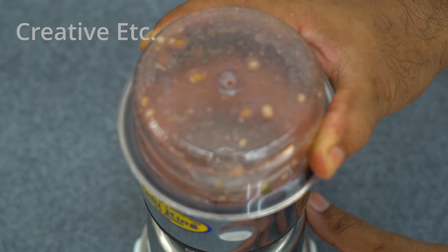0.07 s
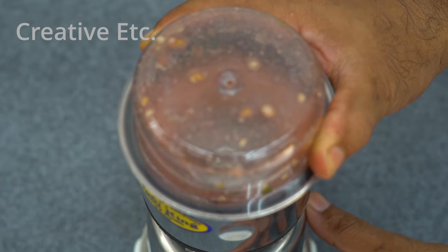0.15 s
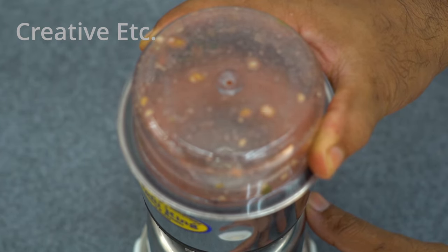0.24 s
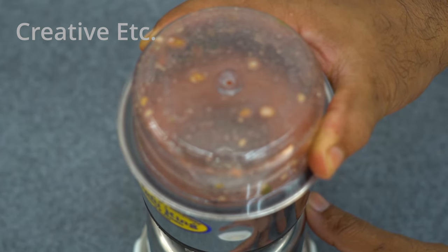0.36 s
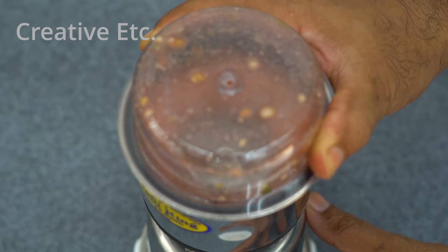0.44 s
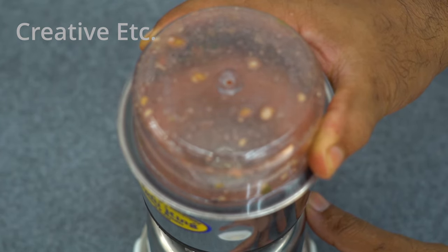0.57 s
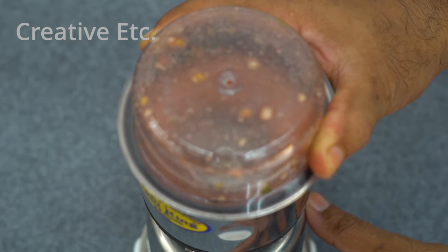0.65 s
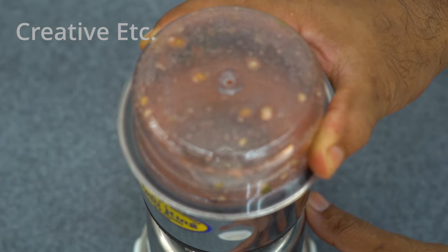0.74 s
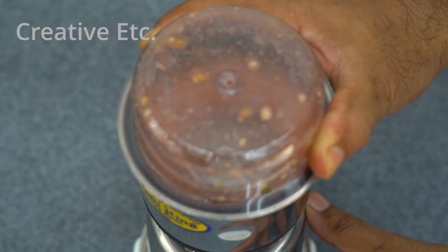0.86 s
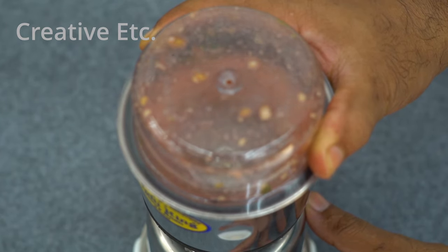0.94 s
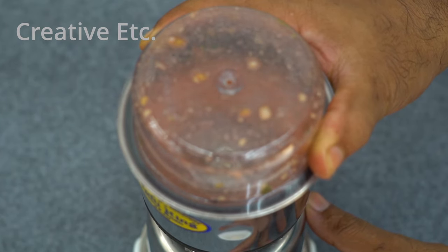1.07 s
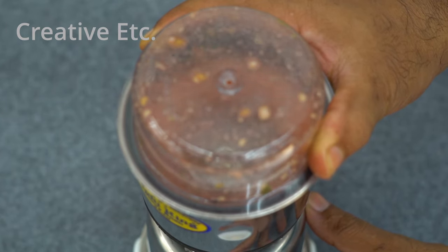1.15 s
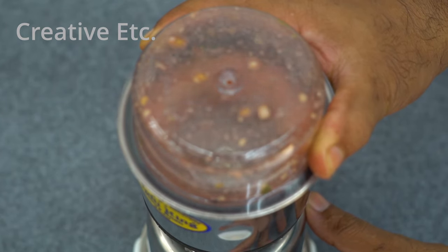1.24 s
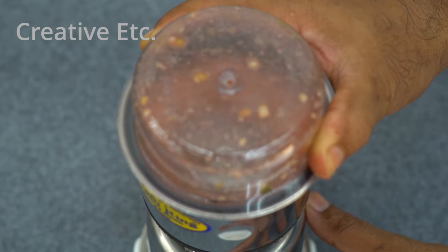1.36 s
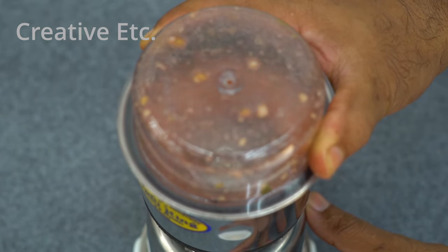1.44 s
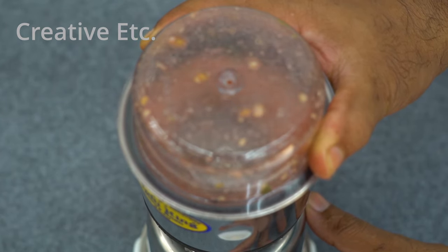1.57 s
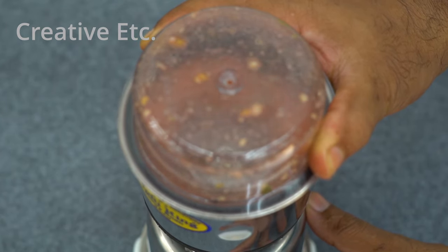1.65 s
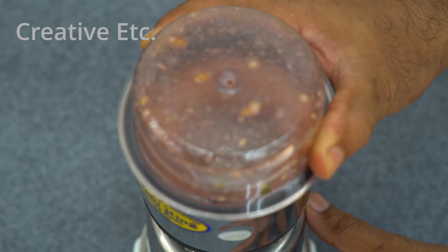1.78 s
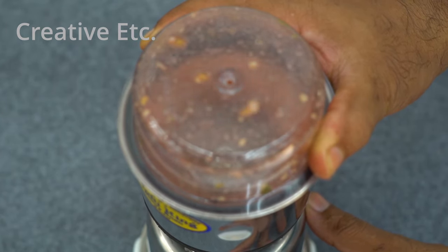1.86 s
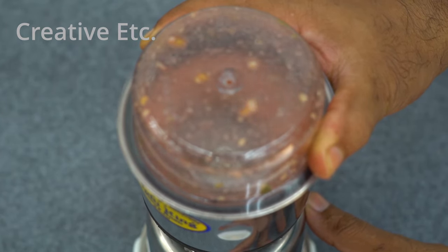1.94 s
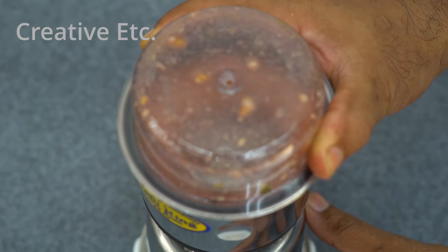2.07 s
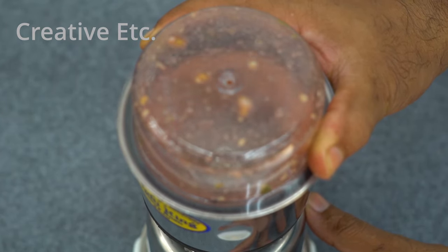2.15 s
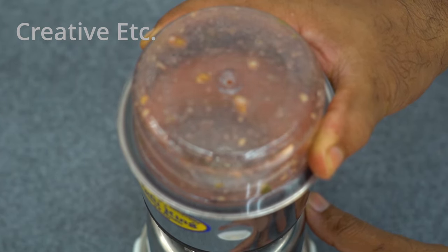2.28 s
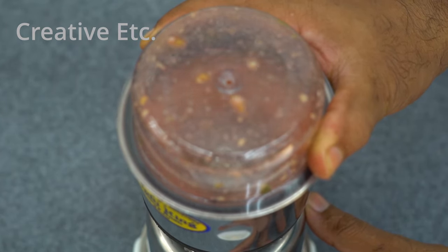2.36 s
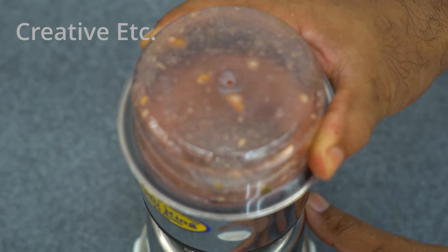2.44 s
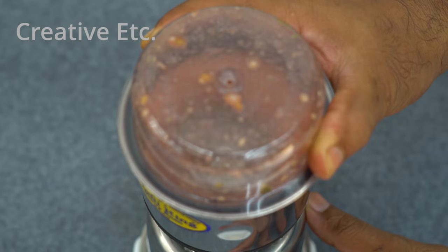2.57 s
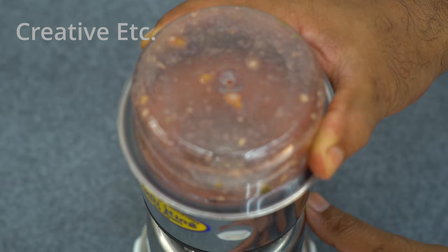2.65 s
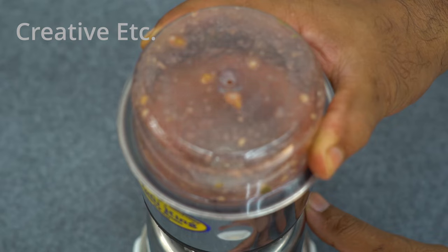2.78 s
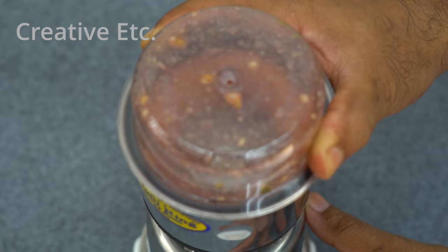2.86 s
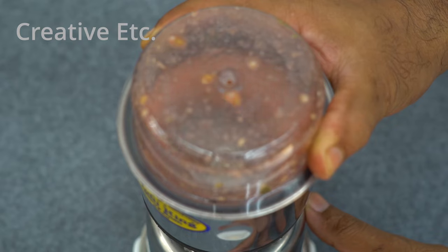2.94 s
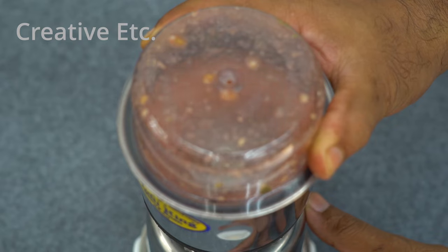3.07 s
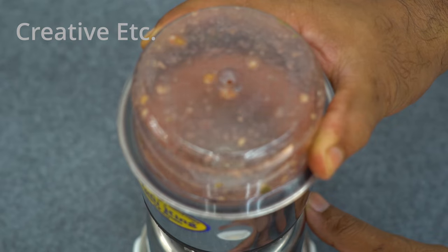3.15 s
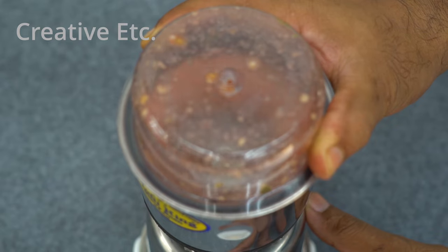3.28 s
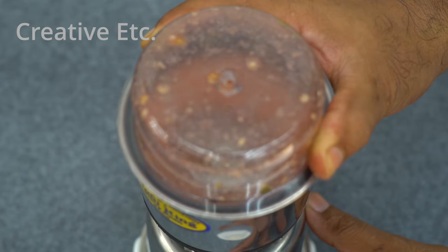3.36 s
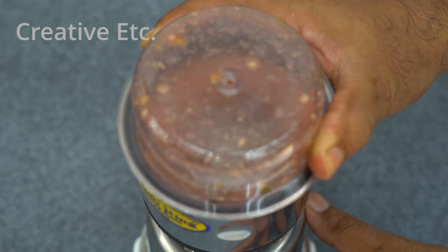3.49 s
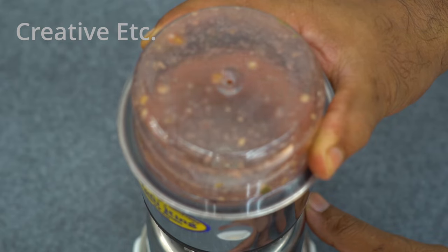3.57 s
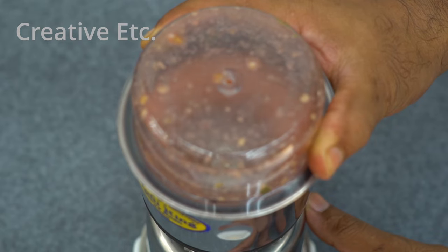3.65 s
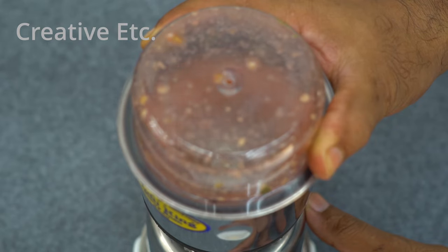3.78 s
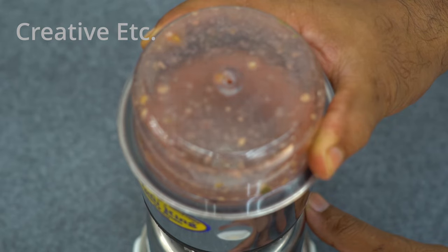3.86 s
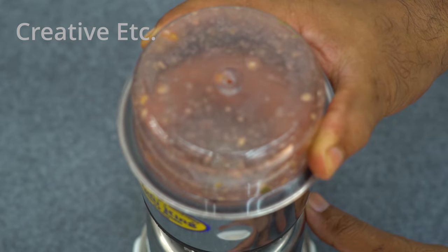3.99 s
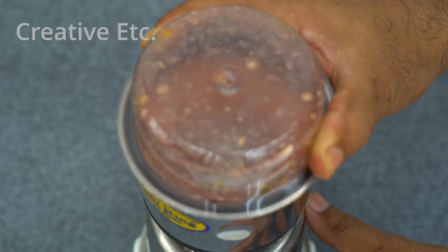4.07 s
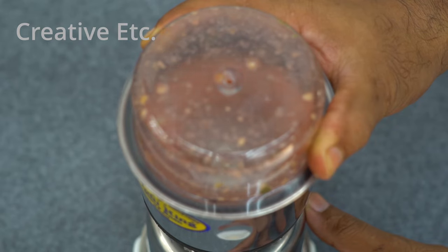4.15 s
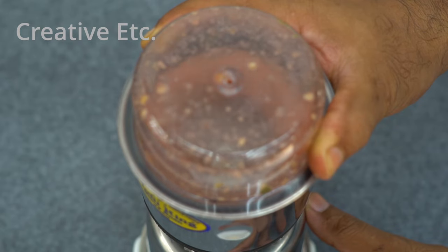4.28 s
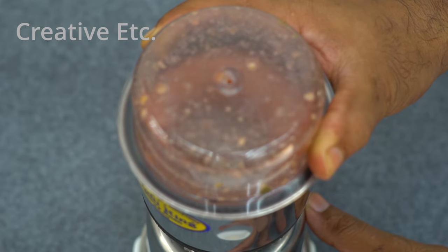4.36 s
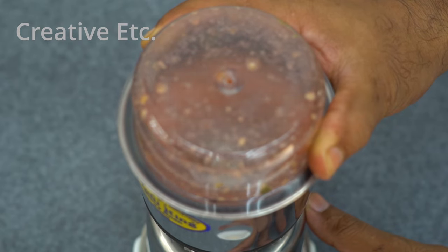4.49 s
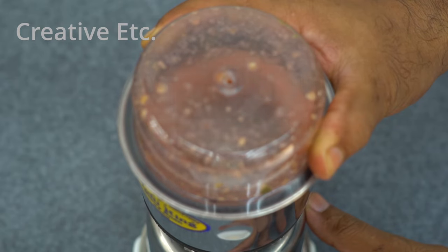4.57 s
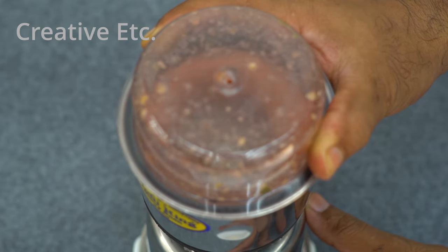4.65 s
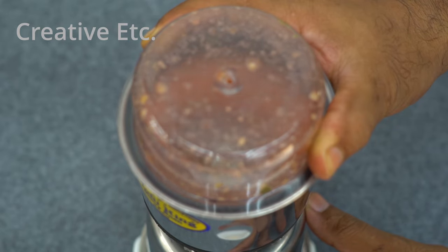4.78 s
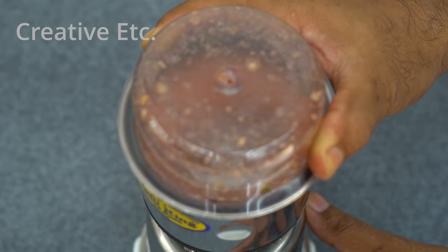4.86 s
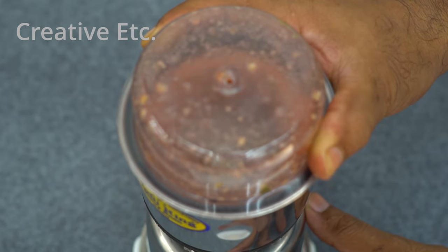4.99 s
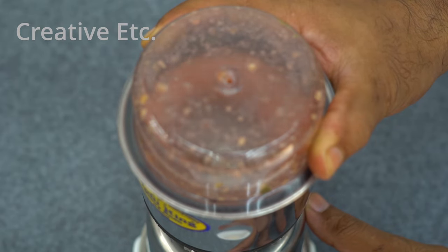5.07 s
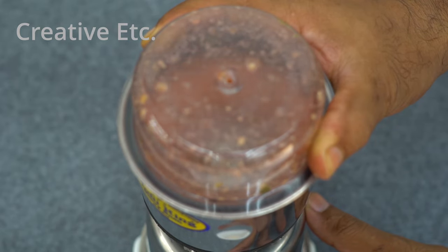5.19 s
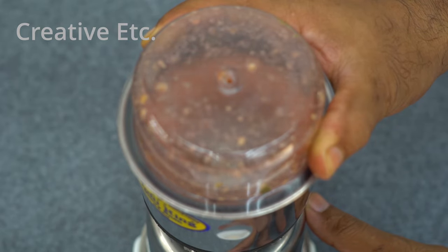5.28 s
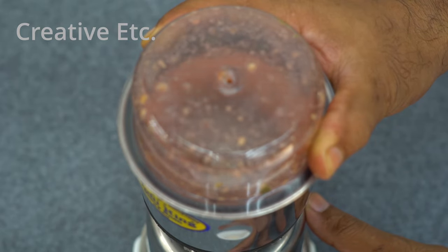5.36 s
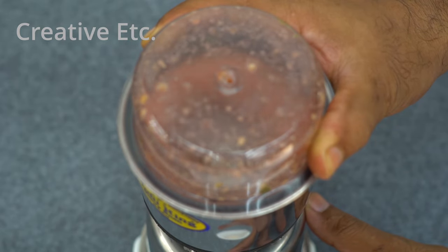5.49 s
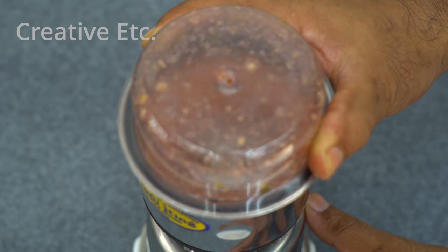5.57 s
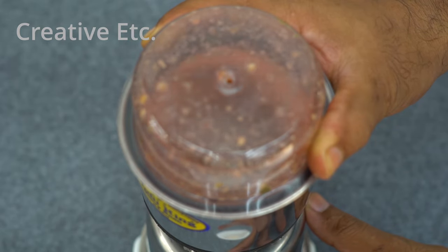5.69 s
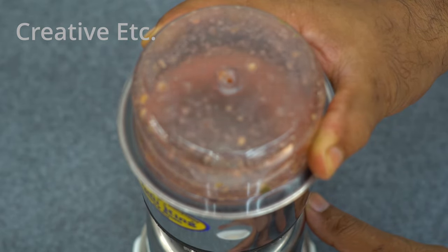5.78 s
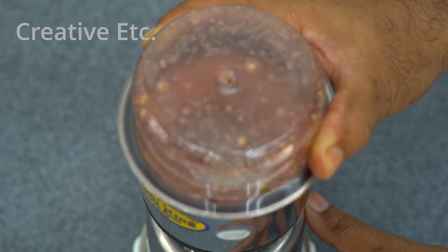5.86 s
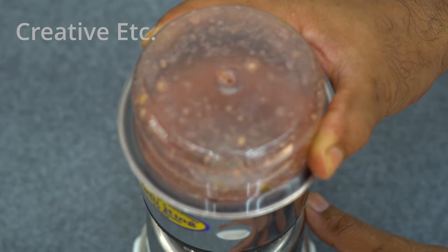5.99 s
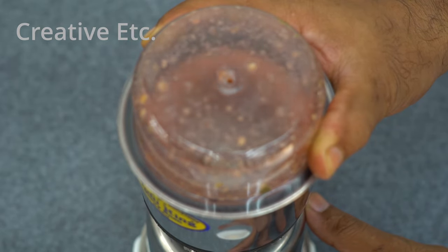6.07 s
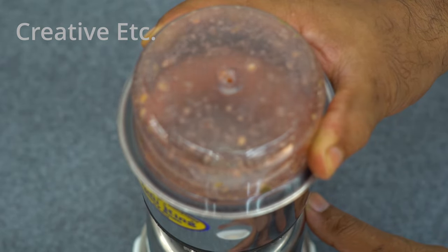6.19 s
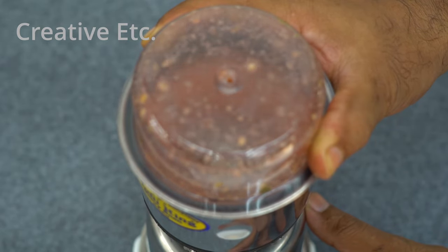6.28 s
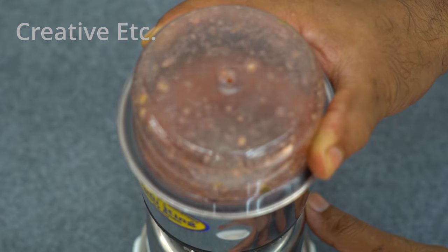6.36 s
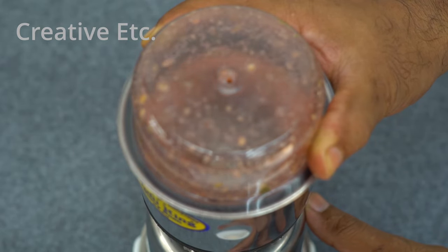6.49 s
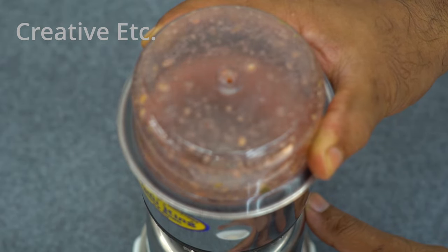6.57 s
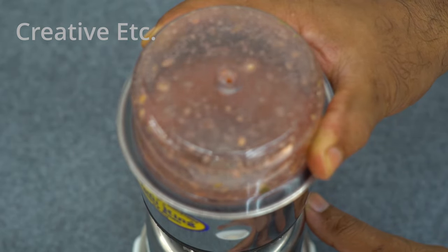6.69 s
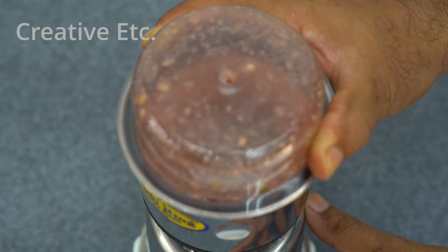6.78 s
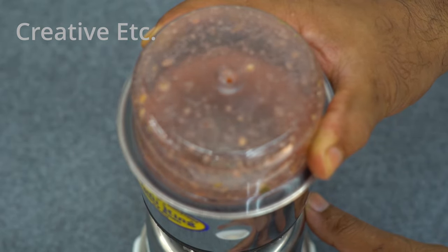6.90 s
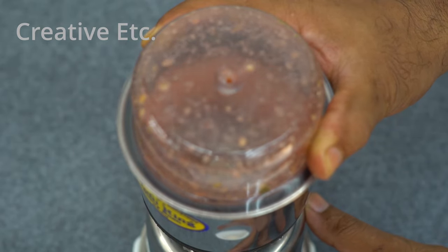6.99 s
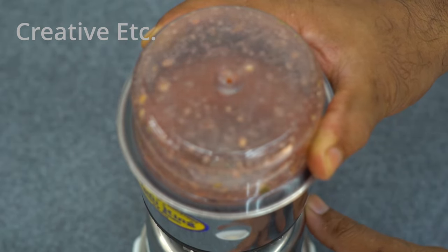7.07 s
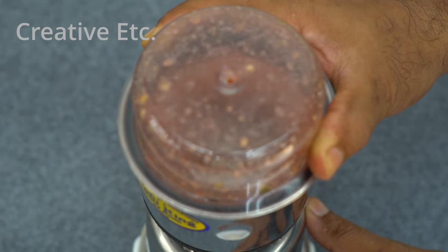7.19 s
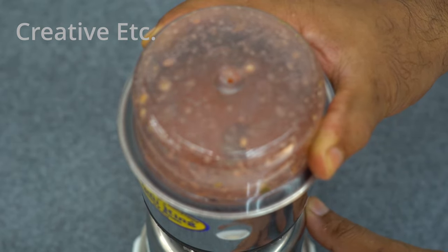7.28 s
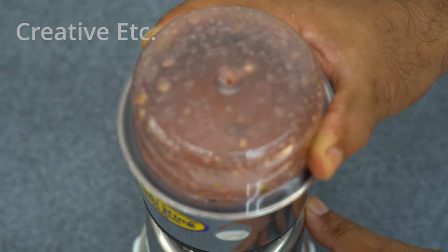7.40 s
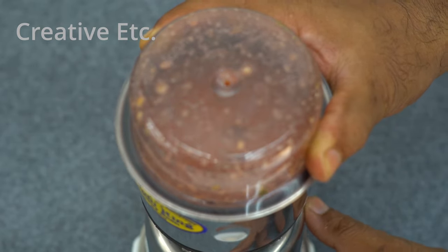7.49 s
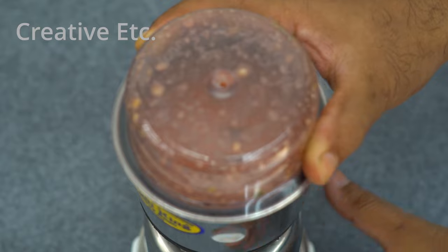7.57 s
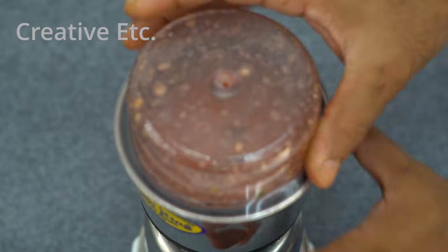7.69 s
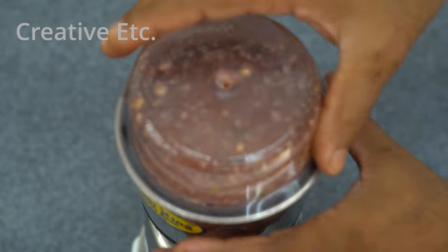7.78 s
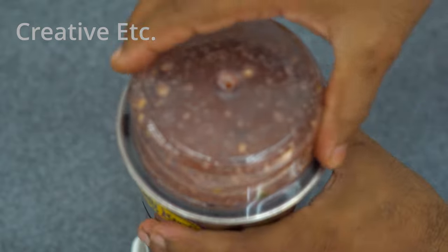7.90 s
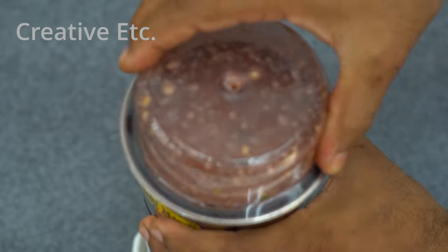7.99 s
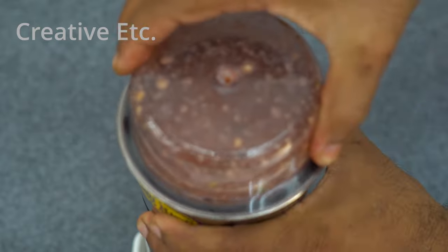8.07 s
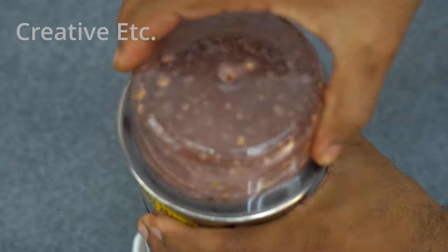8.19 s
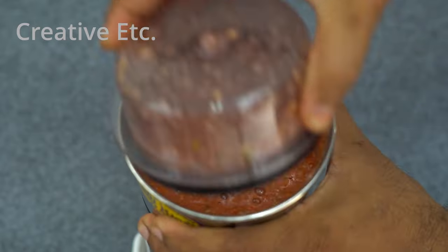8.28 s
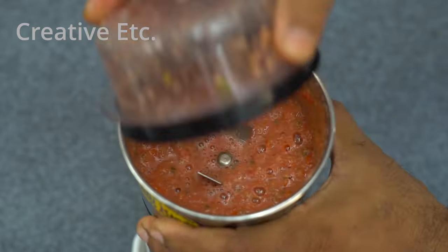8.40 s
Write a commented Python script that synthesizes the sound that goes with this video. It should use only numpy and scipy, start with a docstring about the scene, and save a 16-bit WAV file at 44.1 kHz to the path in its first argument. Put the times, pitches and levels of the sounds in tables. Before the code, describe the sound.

Close up in a hard-walled room, blades spin wet food into paste in a small grinder. The motor hisses and whines, the jar and lid ring under a dense spatter of bits, and the paste churns underneath. Near the end the motor is switched off and dies almost at once, leaving a faint drone. The jar is then shifted on its base, giving quiet scrapes, dull knocks and small metallic clinks.

```python
"""In a hard-walled room, a small kitchen grinder purees wet chopped food in a jar held down by hand.
Its blades throw bits against the jar and lid, which ring; the churning paste sounds the air above it and
shakes the base; the motor whines and its brushes spark with a hiss. Switched off, it soon stops.
Hands then shift and twist the jar on its steel base, and friction makes it rub, squeak and clink.
A faint distant drone and a thin electrical whine go on throughout."""
import sys
import numpy as np
from scipy import signal
from scipy.fft import rfft, irfft, next_fast_len
from scipy.io import wavfile
from scipy.ndimage import uniform_filter1d, map_coordinates

SR = 44100
rng = np.random.default_rng(int(sys.argv[2]) if len(sys.argv) > 2 else 0)


def wav_record(signal):
    """Record a signal, one row per channel, as 16-bit PCM in the file named by sys.argv[1]."""
    frames = np.transpose(np.atleast_2d(signal))
    bounded = np.clip(frames, -1, 1)
    # unit amplitude maps onto the largest positive 16-bit level
    quanta = np.round(bounded * 32767).astype(np.int16)
    wavfile.write(sys.argv[1], SR, quanta)


N = 372195
T = np.arange(N) / SR
SIZE = next_fast_len(N + SR)
FREQS = np.maximum(np.arange(SIZE // 2 + 1) * SR / SIZE, 1)

SHAFT_HZ, MAINS_HZ, OFF_S = 290.14, 50, 7.188
# After switch-off the paste brakes the blades; it swirls a little longer, and the lid rings on.
COAST_DB_PER_S, SWIRL_DB_PER_S, LID_RING_DB_PER_S = 338, 160, 172
TWIST_ATTACK_S, TWIST_RELEASE_DB_PER_S = 0.031, 242

# Resonances. Each row: frequency in Hz, bandwidth in Hz, relative level in dB.
JAR_MODES = [(1163, 28, -17), (1289, 41, -10), (1415, 35, -11), (1505, 45, -9), (1611, 52, -11),
             (2003, 25, -8), (2112, 42, -4), (2213, 30, -3), (2390, 50, -4.5), (2700, 45, -8),
             (2958, 44, -4.5), (3150, 96, -6), (3298, 22, -7)]  # jar and housing
LID_MODE = [(2872, 34, 0)]  # the lid's strongest
MOTOR_MODES = [(4312, 77, -8), (4964, 50, -5), (5684, 38, -7), (7048, 215, -7), (7951, 57, -7),
               (8158, 105, -9), (13076, 278, -13)]  # the motor's metal parts
MOTOR_WHINE = [(4964, 45, -5), (7435, 40, 0)]
AIR_MODES = [(338, 36, -15), (529, 30, 1.5), (657, 58, -5), (817, 34, -10)]  # air above the paste
BASE_MODES = [(263, 49, -8), (327, 49, -1.5), (457, 100, -4), (675, 48, 1.5), (910, 30, -2)]  # plastic of the base
RIM_MODES = [(1490, 45, -10), (1860, 30, -10), (2096, 35, -5.5), (2215, 50, -3.5), (2340, 47, -8),
             (2990, 80, -12), (3116, 36, -4), (4140, 110, -12.5), (5965, 90, -17), (6680, 120, -18),
             (7470, 120, -15), (8110, 90, -12)]  # steel rim

# Broad spectra. Each row: frequency in Hz, relative spectral density in dB.
GRIND_SPECTRUM = [(900, -21.5), (1400, -12), (1900, -5), (2600, -6.5), (3100, -6), (3700, -12), (4100, -18)]
HISS_SPECTRUM = [(3800, -6), (5300, -5), (6000, -2), (6600, -5.5), (7600, -6.5), (8300, -8), (9300, -11.5),
                 (11200, -11), (12600, -15.5), (14500, -16.5), (16000, -20)]
SHAKE_SPECTRUM = [(25, -13.5), (45, -12), (85, 3), (130, 1.5), (190, -6), (250, 10), (330, 8), (430, 2.5)]
DRONE_SPECTRUM = [(30, -25.5), (120, -34), (260, -15), (500, -23.5), (950, -19), (1290, 5), (1650, -9),
                  (2100, -20), (3500, -26.5), (6000, -26.5), (9000, -41), (14000, -41.5)]
GROAN_SPECTRUM = [(245, -18), (280, -7.5), (330, 2), (400, -3.5), (510, -13)]
LID_SPECTRUM = [(2400, -8), (3200, 0), (4000, -5), (5350, 1), (6200, -16), (9000, -15), (10000, -13),
                (11500, -27)]
SCRAPE_SPECTRUM = [(900, -2), (1800, -8), (2700, -12), (3750, -20), (4300, -2), (5400, -10), (8400, -6),
                   (10500, -23), (14000, -38)]

# Level contours. Each row: time in seconds, level in dB.
LID_DRUMMING = [(0.1, -42), (0.55, -36.5), (1.9, -41), (2.5, -43.5), (3.6, -44), (5.5, -42.5), (7.1, -45.5)]  # food on the lid
CHURN_LEVELS = [(0.0, -43.5), (0.6, -43), (1.5, -46), (2.65, -44.5), (3.0, -49.5), (4.0, -46.5),
                (4.7, -48.5), (6.3, -48), (6.7, -45)]  # paste against the wall

# Brief swells. Each row: start in seconds, length in seconds, level in dB.
JOLTS = [(0.005, 0.026, -62), (0.54, 0.04, -66.5), (1.03, 0.05, -66), (1.91, 0.04, -71), (2.12, 0.036, -69),
         (4.17, 0.06, -69.5)]  # heavy lumps jolt the base
LID_SURGES = [(0.45, 0.14, -37.5), (1.28, 0.05, -38.5), (1.72, 0.1, -37.5), (2.02, 0.03, -37.5),
              (2.17, 0.04, -36.5), (2.6, 0.05, -37), (3.02, 0.08, -37.5), (3.48, 0.08, -35.5),
              (3.72, 0.04, -40.5), (4.28, 0.1, -41)]  # surges of load throw more food at the lid
SEAT_RUBS = [(3.3, 0.09, -52), (4.125, 0.13, -46), (4.39, 0.15, -54.5), (8.05, 0.11, -72), (8.2, 0.12, -60),
             (8.35, 0.09, -55.5)]  # the jar rubs on its seat
LID_SWEEPS = [(7.6, 0.08, -83), (7.71, 0.015, -70.5)]  # the hand brushes off the lid

# Hard bits caught by the blades. Each row: start in seconds, peak level in dB.
CHUNKS = [(0.2744, -23), (0.957, -24), (1.349, -31), (1.765, -28), (2.178, -33.5), (3.532, -28.5),
          (4.294, -22.5), (4.3261, -30.5), (4.7391, -30.5), (4.802, -27.5), (5.141, -25.5), (5.2699, -28),
          (6.4497, -25.5)]
# An electrical whine and its mains sidebands. Each row: frequency in Hz, level in dB.
ELECTRICAL_TONES = [(14879, -77.5), (14981, -80.5), (15079, -85)]
# Knocks of jar on base. Each row: start in seconds, peak level in dB, spectral centre in Hz.
KNOCKS = [(7.499, -69, 260), (8.086, -58, 650), (8.2, -47, 480), (8.283, -49, 680), (8.375, -40, 760),
          (8.408, -45, 330)]
# Fingers catch on the lid and squeak, then the steel rim catches and clinks.
# Each row: start in seconds, length in seconds, level in dB, pitch in Hz.
CATCHES = [(7.646, 0.097, -86, 5350), (7.65, 0.1, -94, 10050), (7.88, 0.069, -92, 6500),
           (8.035, 0.05, -72, 3115), (8.055, 0.043, -68, 2215), (8.179, 0.08, -63.5, 3130),
           (8.2, 0.008, -56, 3115), (8.198, 0.04, -75, 4230), (8.322, 0.012, -53.5, 3090),
           (8.333, 0.03, -70, 2220), (8.41, 0.02, -55, 2210)]
# A finger slides on the jar. Each row: time in seconds, pitch in Hz, level in dB.
FINGER_SLIDE = [(7.76, 305, -85), (7.79, 300, -82), (7.95, 285, -80), (8.01, 290, -66), (8.05, 287, -84)]
# Pushes that twist the jar. Each row: start in seconds, length in seconds, scrape in dB, rub in dB.
TWISTS = [(8.0, 0.04, -71, -80), (8.06, 0.09, -62, -75), (8.185, 0.045, -57, -72),
          (8.315, 0.062, -50, -57.5), (8.42, 0.03, -66, -54.5)]

# Reverberation. Each row: frequency in Hz, time to decay by 60 dB in seconds.
ROOM_DECAY = [(150, 0.11), (600, 0.29), (1500, 0.34), (3000, 0.45), (6000, 0.25), (14000, 0.079)]
# The bass image holds still, centred (phase 0) or hollow and wide (phase near pi).
# Each row: midpoint in seconds, half length in seconds, phase between the ears in radians.
BASS_HOLDS = [(0.062, 0.077, 1), (0.226, 0.026, 3.5), (0.54, 0.027, -1.5), (0.663, 0.026, -0.5),
              (0.76, 0.047, 3.5), (1.02, 0.071, 1), (1.392, 0.074, 3), (1.793, 0.11, 1), (2.25, 0.079, 3),
              (2.368, 0.034, 1), (2.52, 0.08, 1.1), (3.25, 0.036, 3), (3.35, 0.04, 1), (3.668, 0.065, 2),
              (4.118, 0.035, 0.1), (4.298, 0.1, 3.5), (4.593, 0.12, 3.5), (4.868, 0.033, 3),
              (5.16, 0.045, 4), (5.598, 0.038, 4), (5.732, 0.021, 2.5), (5.926, 0.065, 3),
              (6.219, 0.057, 3.5), (6.764, 0.048, -1.5), (6.864, 0.028, 2.5), (7.08, 0.05, -1),
              (7.182, 0.052, 3.5), (7.9, 0.09, 1), (8.192, 0.16, 3.5), (8.42, 0.034, 1)]
# Stereo balance. Each row: frequency in Hz, left minus right level in dB.
BALANCE = [(100, 0), (500, 0.8), (1300, 0), (2300, -3), (3000, 0), (4500, 1.5), (14000, 2.5)]


def undb(db):
    """Decibels to amplitude gain."""
    return 10 ** (np.asarray(db) / 20)


def unit(x):
    """Scale to rms 1."""
    return x / np.sqrt(np.mean(x ** 2))


def noise():
    """White Gaussian noise."""
    return rng.standard_normal(N)


def walk(rate):
    """Smooth random variation of rms 1, changing about rate times a second."""
    step = max(int(SR / rate), 2)
    stairs = np.repeat(rng.standard_normal(N // step + 1), step)
    return unit(uniform_filter1d(stairs, step)[:N])


def clicks(rate, spread_db):
    """Shot noise: random impulses, rate a second, with sizes scattered by spread_db."""
    return (rng.random(N) < rate / SR) * np.sign(noise()) * undb(spread_db * np.clip(noise(), -2, 2))


def contour(rows, column=1):
    """Gain interpolated in time from a table's dB column."""
    rows = np.array(rows)
    return undb(np.interp(T, rows[:, 0], rows[:, column]))


def strokes(rows, attack_s, release_db_per_s, column=2):
    """Envelope of events: each rises up to its start, holds for its length and decays exponentially."""
    gain = 0
    for row in rows:
        start, length = row[:2]
        rise = np.clip(1 + (T - start) / attack_s, 0, 1)
        gain += rise * undb(row[column] - release_db_per_s * np.maximum(T - start - length, 0))
    return gain


def coasting(db_per_s):
    """Exponential decay once the power is cut."""
    return undb(-db_per_s * np.maximum(T - OFF_S, 0))


def steady(x, share, span_s):
    """Compression evens out chance swells by the given share; rms 1."""
    power = uniform_filter1d(x ** 2, max(int(span_s * SR), 2))
    return unit(x / (power + np.mean(x ** 2) / 10) ** (share / 2))


def along(points):
    """Interpolate (Hz, value) points on a log-frequency axis."""
    hz, value = np.transpose(points)
    return np.interp(np.log(FREQS), np.log(hz), value)


def colour(points):
    """Gain of a broad spectrum, falling 24 dB an octave beyond its ends."""
    outside = np.minimum(1, np.minimum(FREQS / points[0][0], points[-1][0] / FREQS))
    return undb(along(points)) * outside ** 4


def band_around(hz):
    """Gain of a broad peak that halves at half an octave from hz."""
    return 1 / (1 + (2 * np.log2(FREQS / hz)) ** 2)


def ringing(modes):
    """Gain of resonances added in power, their skirts dying out within an octave."""
    return np.sqrt(sum((undb(db) * band_around(hz)) ** 2 / (1 + (2 * (FREQS - hz) / width) ** 2)
                       for hz, width, db in modes))


def small_body(modes, low_hz):
    """Resonances of a body too small to radiate long wavelengths."""
    return ringing(modes) / (1 + (low_hz / FREQS) ** 8)


def through(x, gain):
    """Minimum-phase filter: by causality, a click rings only after it strikes."""
    cepstrum = irfft(np.log(gain / gain.max() + 1e-6), SIZE)
    cepstrum[1:SIZE // 2] *= 2
    cepstrum[SIZE // 2 + 1:] = 0
    return irfft(rfft(x, SIZE) * np.exp(rfft(cepstrum)), SIZE)[:N]


def blows(rows, body, rattle=0):
    """Impulse response: each blow rings a body to its peak level; a short rattle may add to it."""
    impulse = np.zeros(N)
    impulse[0] = 1
    force = 0
    for start, db in rows:
        rattling = rattle * (T >= start) * np.exp(-np.abs(T - start) / 0.014)
        force += undb(db) * (np.roll(impulse, int(start * SR)) + rattling)
    return through(force * np.sign(noise()), body) / np.abs(through(impulse, body)).max()


def room(x, near_db, moves_per_s, spots):
    """Reverberation: sound leaves from shifting spots, each with its own reflections to each ear."""
    t = T[:SR // 2]
    log_centres = np.log([hz for hz, t60 in ROOM_DECAY])
    log_freqs = np.log(np.maximum(np.arange(len(t) // 2 + 1) * SR / len(t), 1))
    white = rfft(rng.standard_normal((spots, 2, len(t))))
    paths = undb(near_db) * rng.standard_normal((spots, 2, len(t))) * unit(np.exp(-t / 0.0039))
    for share, (_, t60) in zip(np.eye(len(ROOM_DECAY)), ROOM_DECAY):
        band = irfft(white * np.interp(log_freqs, log_centres, share), len(t))
        paths += band * unit(np.exp(-np.log(1000) * t / t60))
    responses = rfft(paths.astype(np.float32), SIZE)
    responses /= np.sqrt(np.mean(np.abs(responses) ** 2, axis=0))  # flat on average over the spots
    weights = np.array([walk(moves_per_s) for _ in range(spots)])
    weights /= np.sqrt(np.sum(weights ** 2, axis=0))
    emitted = rfft((weights * x).astype(np.float32), SIZE)
    return irfft(np.sum(emitted[:, None] * responses, axis=0), SIZE)[:, :N]


def widen(x, drift_rad=2.24, bass_edge_hz=582):
    """Interaural phase drifts at equal loudness, separately in the bass and the band above."""
    def spread(band, rad):
        return np.real(signal.hilbert(band, SIZE)[:N] * np.exp(0.5j * np.outer([1, -1], rad)))

    angle = drift_rad * walk(13)
    for middle, half, held in BASS_HOLDS:
        angle += (held - angle) / (1 + ((T - middle) / half) ** 6)
    bass = irfft(rfft(x, SIZE) / (1 + (FREQS / bass_edge_hz) ** 30), SIZE)[:N]
    return spread(bass, angle) + spread(x - bass, drift_rad * walk(22))


def food_impacts(shaft_angle, wall_db=-31, fade_db_per_s=0.21):
    """Impacts excite the modes of jar and lid; those on the jar thicken as each of two blades passes."""
    strikes = clicks(14000 * (1 + 0.6 * np.cos(2 * shaft_angle)), spread_db=5.5)
    jar = ringing(JAR_MODES) + undb(2.5) * colour(GRIND_SPECTRUM)
    wall = steady(through(strikes, jar), share=0.7, span_s=0.013)
    wall *= undb(wall_db - fade_db_per_s * T) * coasting(COAST_DB_PER_S)  # finer bits sound softer
    lid = through(clicks(3000, spread_db=2.5), ringing(LID_MODE))
    lid = steady(lid, share=0.77, span_s=0.04) * contour(LID_DRUMMING) * coasting(LID_RING_DB_PER_S)
    return wall + lid + blows(CHUNKS, jar, rattle=0.26)


def brush_hiss(shaft_angle):
    """Shot noise: carbon brushes spark on the commutator, harder at each mains peak and once a turn."""
    load = 1 + 0.12 * np.cos(2 * np.pi * 2 * MAINS_HZ * T) + 0.08 * np.cos(shaft_angle)
    sparks = clicks(16000, spread_db=3.8) * load
    motor = colour(HISS_SPECTRUM) + undb(-2) * ringing(MOTOR_MODES)
    return undb(-40.5) * unit(through(sparks, motor))


def motor_whine(level_db=-48.3, flicker_db=2.06):
    """Narrow-band noise is heard as a thin pitch, which comes and goes over the hiss."""
    ears = [steady(through(noise(), ringing(MOTOR_WHINE)), share=0.2, span_s=0.02) for _ in range(2)]
    flicker = (walk(3) + walk(12)) / np.sqrt(2)
    return np.array(ears) * undb(level_db + flicker_db * flicker)


def grinder():
    """Amplitude modulation: one shaft, wavering under load, paces both the impacts and the sparks."""
    drive = coasting(COAST_DB_PER_S)
    shaft_hz = SHAFT_HZ * (1 + 0.03 * walk(6)) * drive ** 0.31
    shaft_angle = 2 * np.pi * np.cumsum(shaft_hz) / SR
    sparking = drive * undb(0.79 * walk(22))
    vents = undb(-1.5) * np.array([brush_hiss(shaft_angle) for _ in range(2)]) * sparking
    radiated = food_impacts(shaft_angle) + brush_hiss(shaft_angle) * sparking
    return room(radiated, near_db=-1.5, moves_per_s=40, spots=12) + vents + motor_whine() * drive


def churning(slosh_depth=0.012, sloshes_per_s=7):
    """Cavity resonance: slaps of paste sound the jar's air space, whose pitch shifts as they slosh."""
    air = through(clicks(6000, spread_db=0), small_body(AIR_MODES, low_hz=300))
    warped_samples = np.cumsum(1 + slosh_depth * walk(sloshes_per_s))
    air = map_coordinates(air, [warped_samples], order=1, mode="mirror")
    return steady(air, share=0.76, span_s=0.028) * contour(CHURN_LEVELS)


def base_shake(smooth_db=-73.5, lumpy_extra_db=8, smoothing_s=1.9, judder_db=2.5):
    """Forced vibration: unbalanced paste shakes the base in fits, less as it gets smooth."""
    unbalance = undb(smooth_db + lumpy_extra_db * np.exp(-T / smoothing_s))
    jolts = strokes(JOLTS, attack_s=0.025, release_db_per_s=155)
    rumble = unit(through(noise(), colour(SHAKE_SPECTRUM)))
    return rumble * undb(judder_db * walk(28)) * np.hypot(unbalance, jolts)


def background(drone_db=-67.5):
    """A diffuse distant drone, uncorrelated between the ears, and a whine with mains sidebands."""
    drone = np.array([unit(through(noise(), colour(DRONE_SPECTRUM))) for _ in range(2)])
    whine = sum(undb(db) * np.sin(2 * np.pi * (hz * T + rng.random((2, 1)) / 3))
                for hz, db in ELECTRICAL_TONES)
    return undb(drone_db) * drone + whine


def lid_surges():
    """Resonance: the lid's strongest mode flares up with each surge of load."""
    ears = [steady(through(noise(), ringing(LID_MODE)), share=0.72, span_s=0.02) for _ in range(2)]
    return np.array(ears) * strokes(LID_SURGES, attack_s=0.04, release_db_per_s=201.5)


def seat_groans():
    """Stick-slip friction of the jar on its seat makes a low groan."""
    slips = through(clicks(2500, spread_db=0.5), colour(GROAN_SPECTRUM))
    envelope = strokes(SEAT_RUBS, attack_s=0.057, release_db_per_s=147)
    return steady(slips, share=0.6, span_s=0.031) * envelope


def jar_knocks(base):
    """Impact excitation: each dull knock of the jar rings one band of the base's modes."""
    return sum(blows([(start, db)], base * band_around(hz)) for start, db, hz in KNOCKS)


def hand_on_lid():
    """Sliding friction gives a short hiss as the hand brushes off the lid."""
    friction = unit(through(noise(), colour(LID_SPECTRUM)))
    return friction * strokes(LID_SWEEPS, attack_s=0.023, release_db_per_s=451)


def catch_tones(pitch_jitter=0.00894, chatter_db=3.5):
    """Friction drives one mode of lid or rim at each catch; it chatters, then decays freely."""
    chatter = undb(chatter_db * walk(90))
    tones = 0
    for start, length, db, hz in CATCHES:
        phase = 2 * np.pi * np.cumsum(hz * (1 + pitch_jitter * walk(300))) / SR
        envelope = strokes([(start, length, db)], attack_s=0.011, release_db_per_s=548)
        tones += np.sqrt(2) * np.sin(phase) * envelope
    return chatter * tones


def finger_squeak(pitch_jitter=0.032, fade_s=0.0257):
    """Stick-slip oscillation of skin on plastic gives a wavering pitch and its octave."""
    times, hz, _ = np.transpose(FINGER_SLIDE)
    phase = 2 * np.pi * np.cumsum(np.interp(T, times, hz) * (1 + pitch_jitter * walk(90))) / SR
    contact = np.clip(1 + np.minimum(T - times[0], times[-1] - T) / fade_s, 0, 1)
    return unit(np.sin(phase) + 1.4 * np.sin(2 * phase)) * contour(FINGER_SLIDE, column=2) * contact


def twist_rub(base):
    """Friction excites the low modes of the base as the hands twist the jar."""
    rub = unit(through(clicks(1500, spread_db=2.5), base))
    return rub * strokes(TWISTS, TWIST_ATTACK_S, TWIST_RELEASE_DB_PER_S, column=3)


def rim_scrape():
    """Friction as tiny impacts: the steel rim rings as it scrapes on the base."""
    rim = ringing(RIM_MODES) + undb(-18) * colour(SCRAPE_SPECTRUM)
    scrape = unit(through(clicks(5000, spread_db=1), rim))
    return scrape * strokes(TWISTS, TWIST_ATTACK_S, TWIST_RELEASE_DB_PER_S)


def scene(scatter_db=-7, catch_room_db=-8):
    """Superposition of grinder and hands, a little off centre; lows and clinks stay mostly dry."""
    swirl = coasting(SWIRL_DB_PER_S)
    paste = (churning() + base_shake()) * swirl
    base = small_body(BASE_MODES, low_hz=216.5)
    lows = widen(paste + seat_groans() + twist_rub(base) + jar_knocks(base) + finger_squeak())
    # Churning scattered by the walls differs in each ear.
    scattered = undb(scatter_db) * np.array([churning(), churning()]) * swirl
    catches = catch_tones()
    handling = hand_on_lid() + rim_scrape() + undb(catch_room_db) * catches
    hands = catches + room(handling, near_db=7, moves_per_s=28, spots=4)
    mix = grinder() + lid_surges() + lows + scattered + hands + background()
    ear_gains = undb(np.outer([0.5, -0.5], along(BALANCE)))
    return irfft(rfft(mix, SIZE) * ear_gains, SIZE)[:, :N]


def record(dry):
    """A steep low-pass filter removes the treble above 15.8 kHz."""
    return signal.sosfilt(signal.ellip(10, 0.2, 70, 15800, fs=SR, output="sos"), dry)


dry = scene()
out = record(dry)
wav_record(out)
```